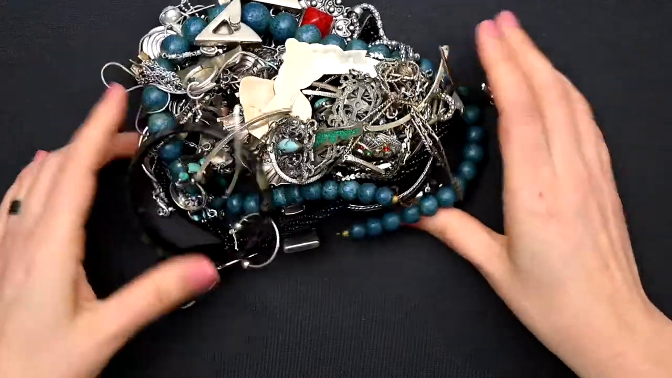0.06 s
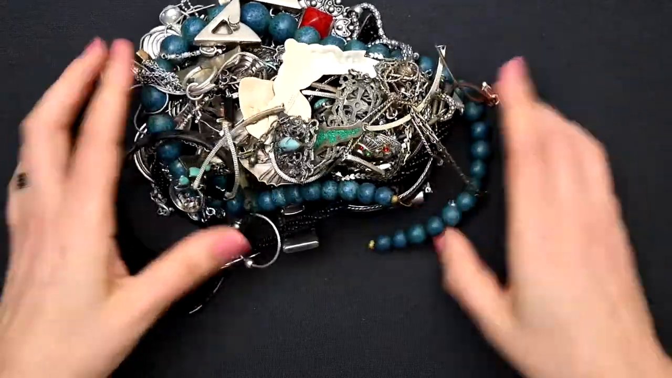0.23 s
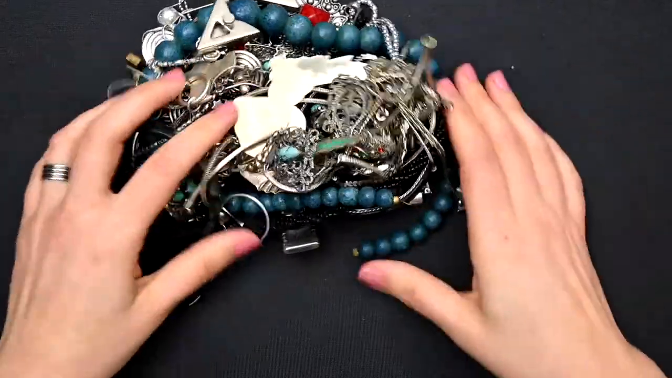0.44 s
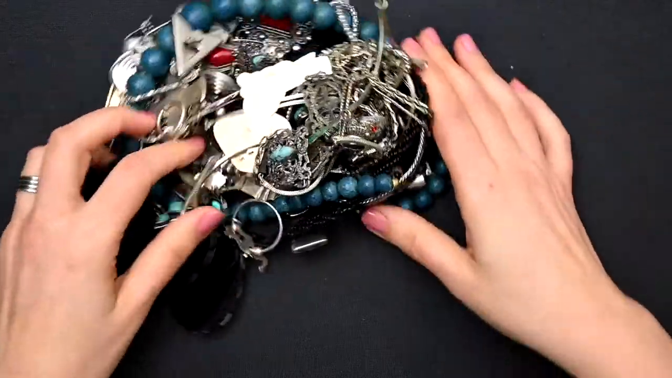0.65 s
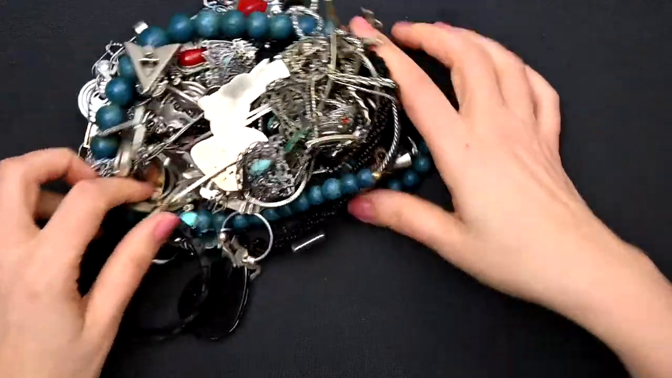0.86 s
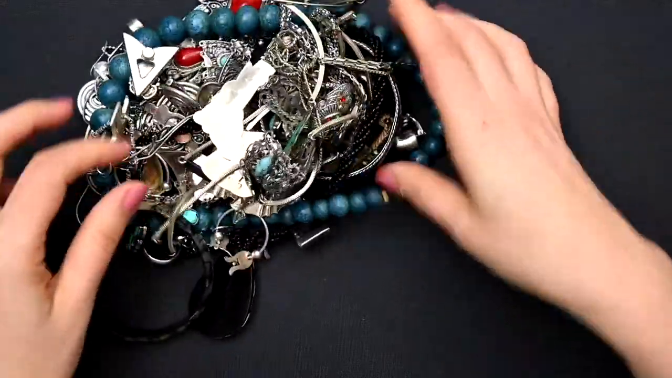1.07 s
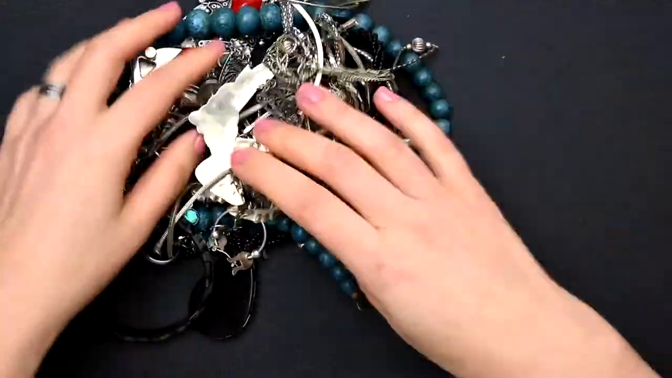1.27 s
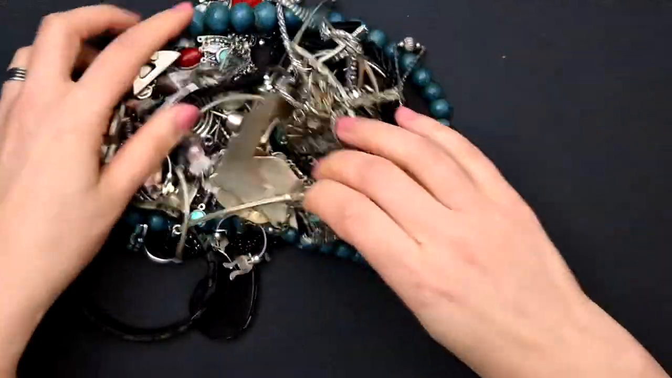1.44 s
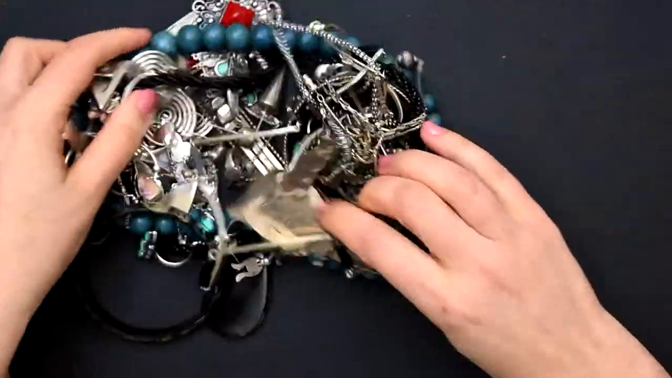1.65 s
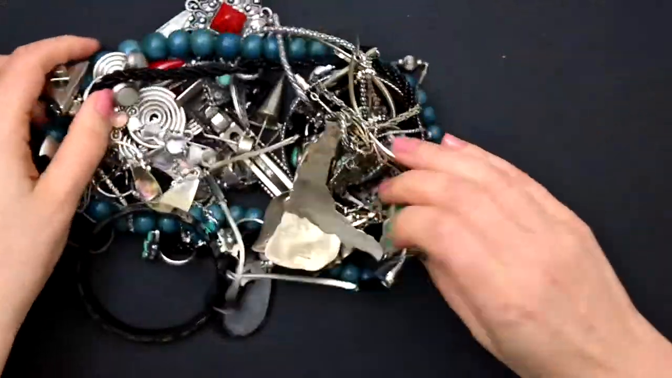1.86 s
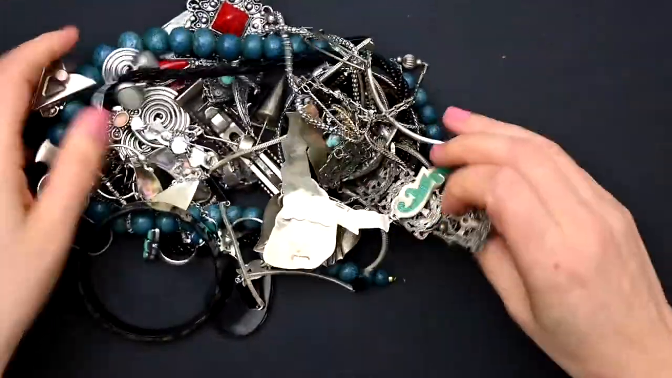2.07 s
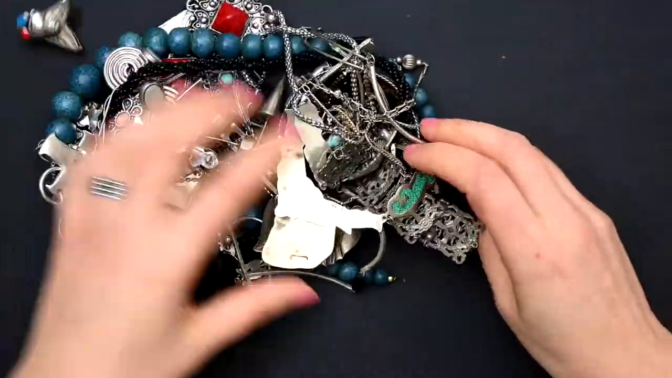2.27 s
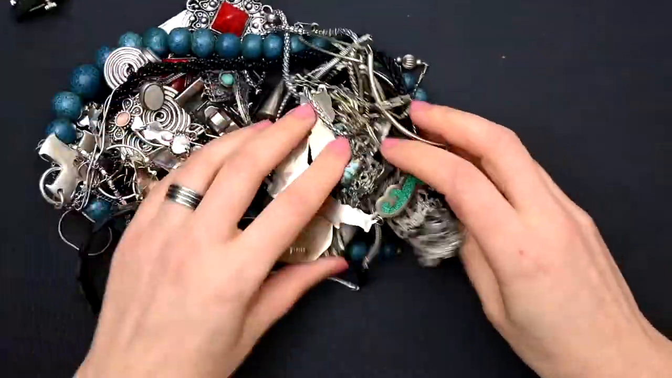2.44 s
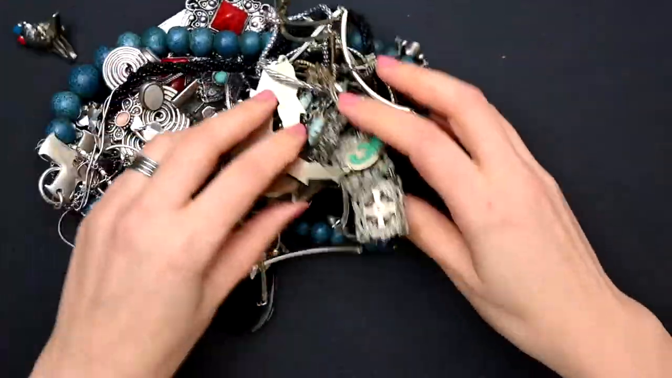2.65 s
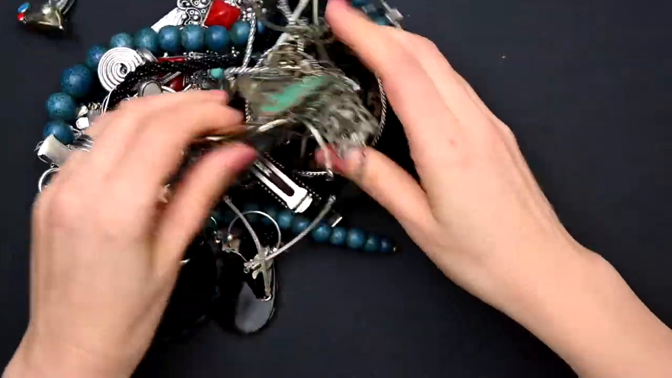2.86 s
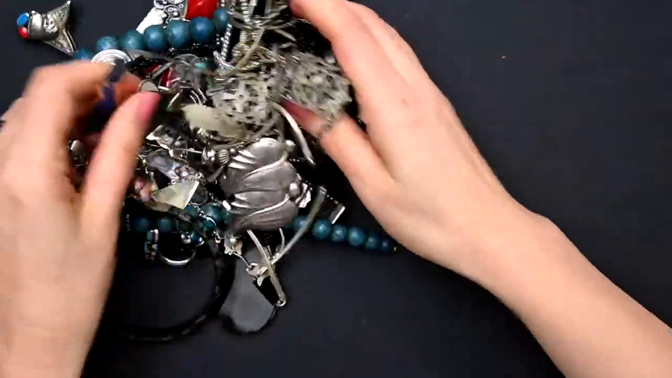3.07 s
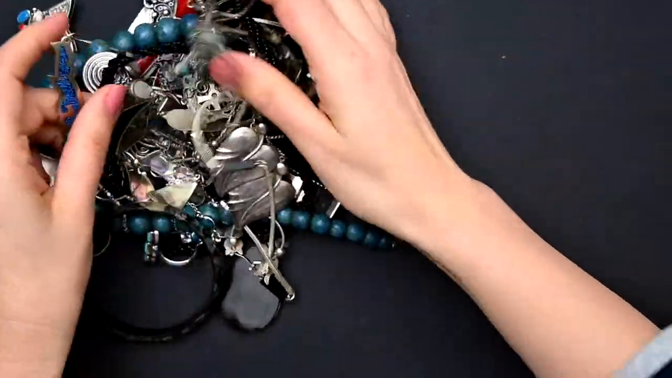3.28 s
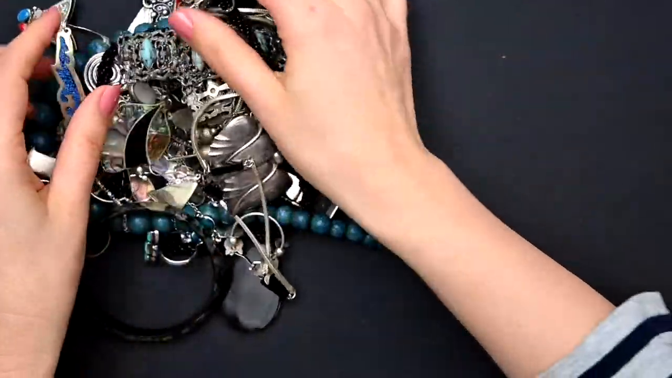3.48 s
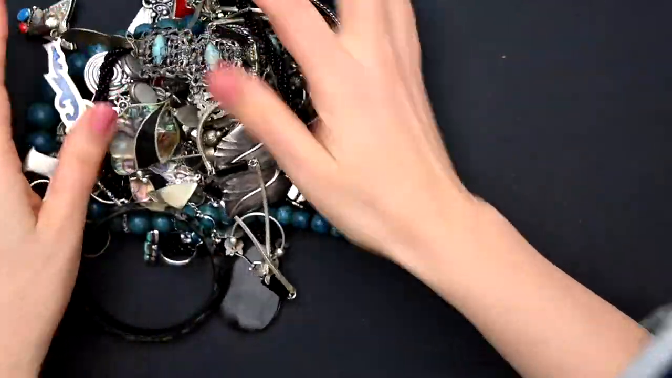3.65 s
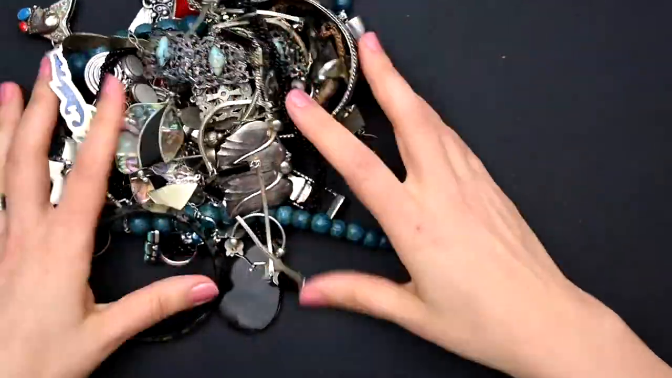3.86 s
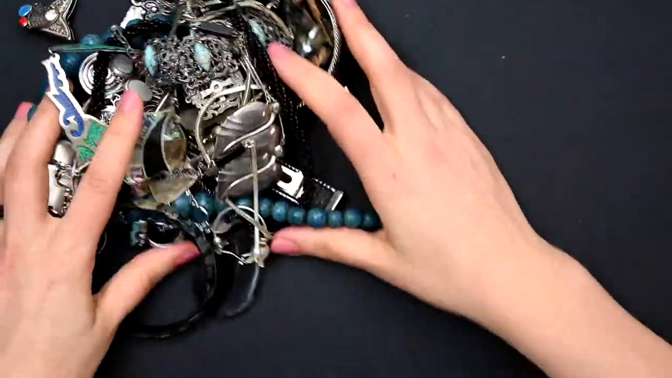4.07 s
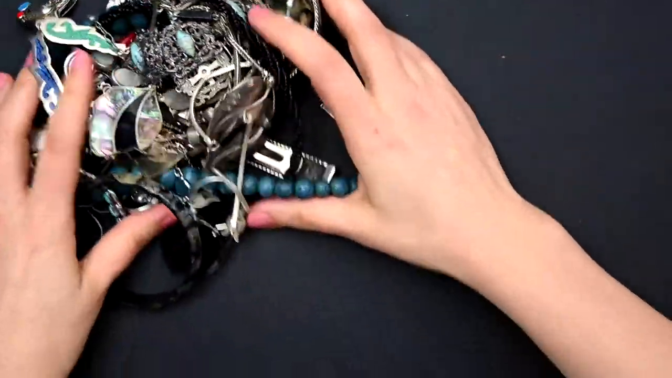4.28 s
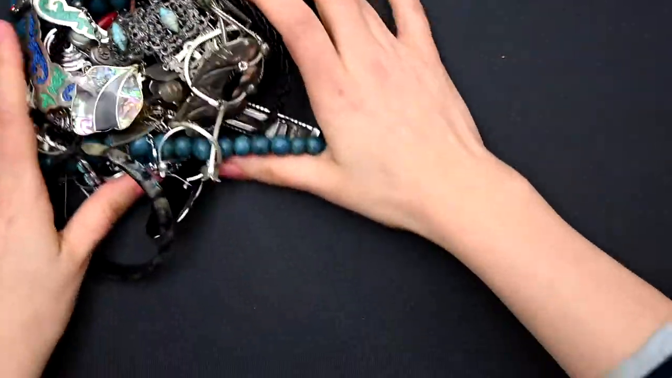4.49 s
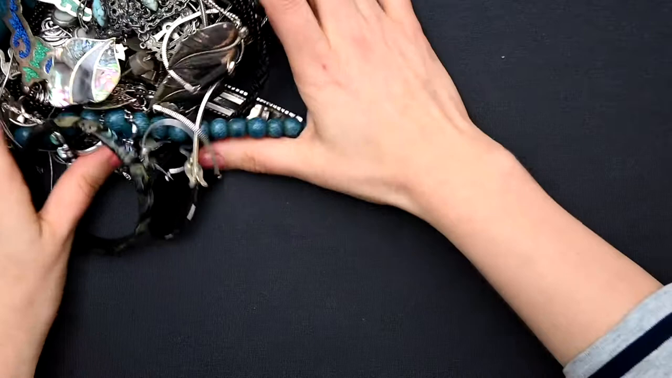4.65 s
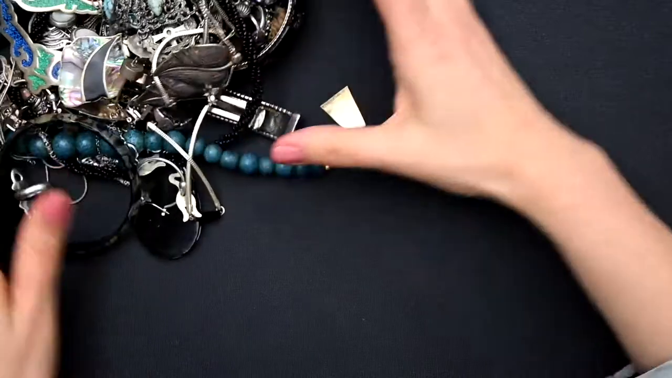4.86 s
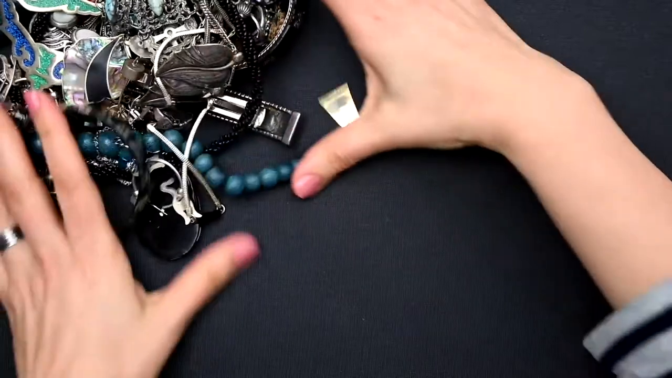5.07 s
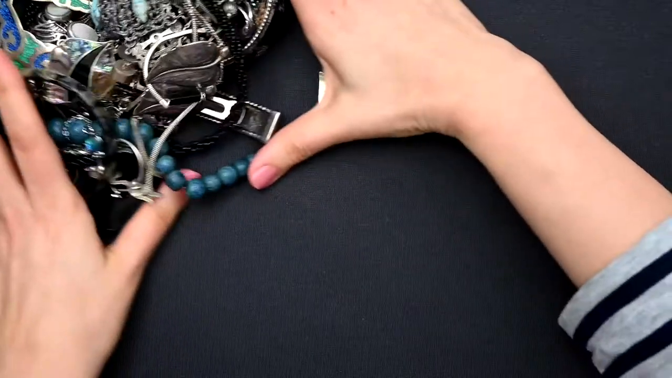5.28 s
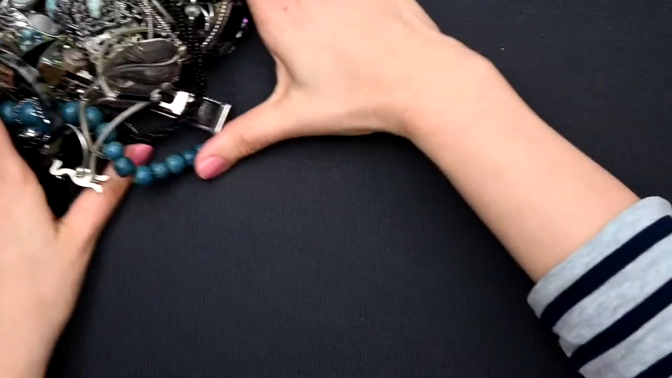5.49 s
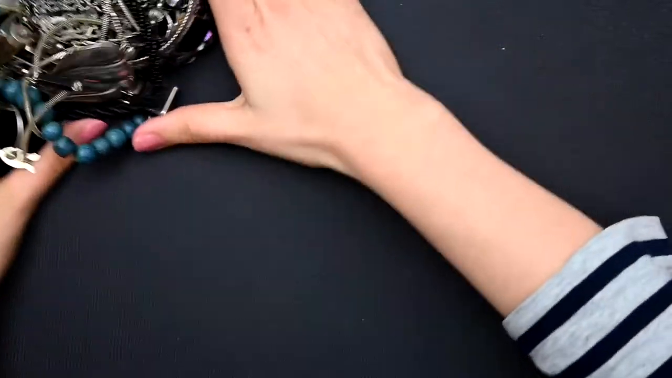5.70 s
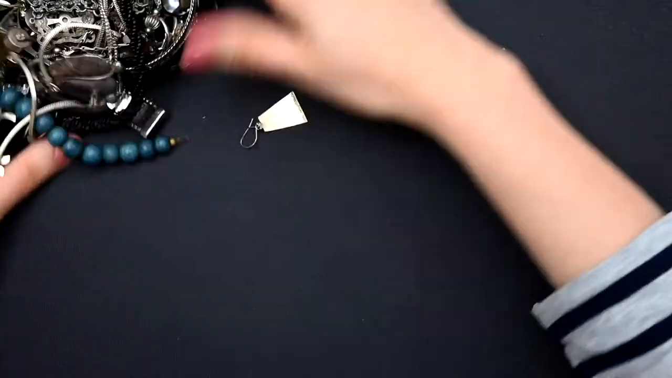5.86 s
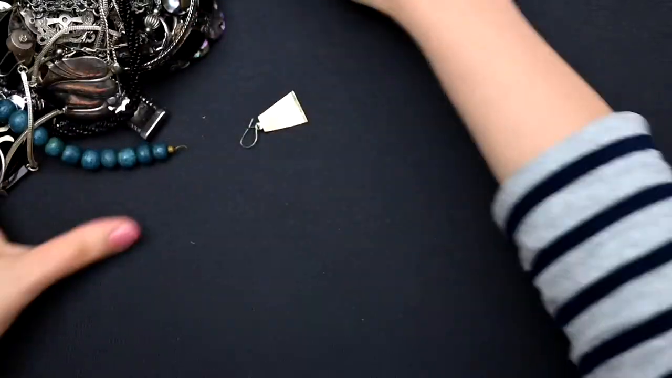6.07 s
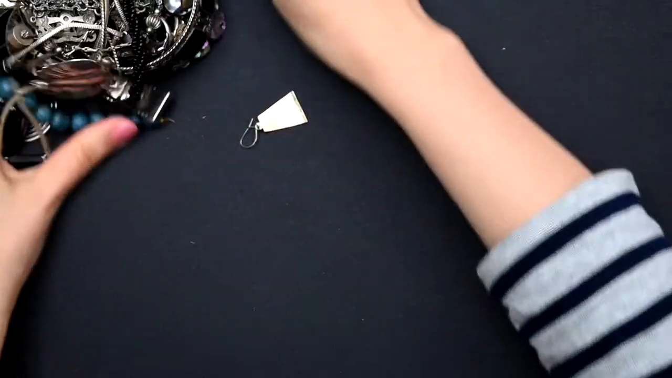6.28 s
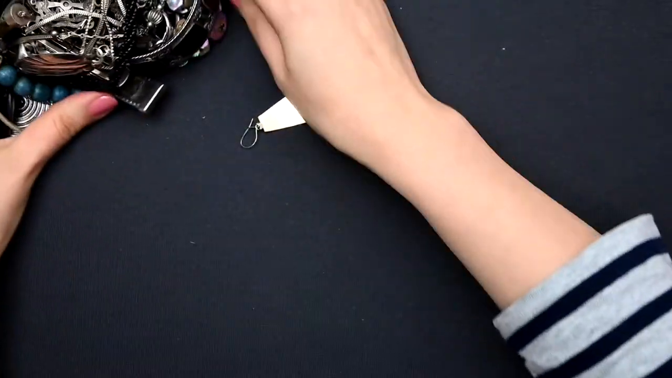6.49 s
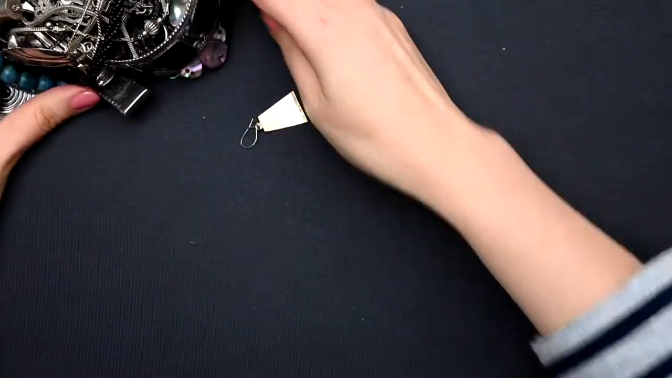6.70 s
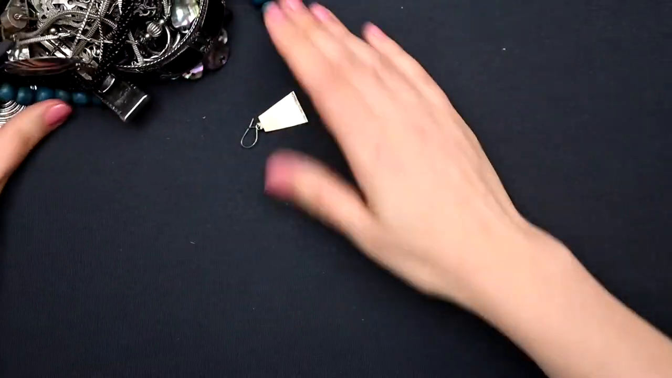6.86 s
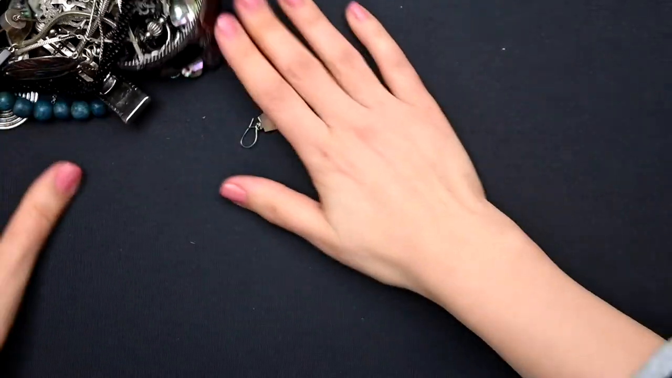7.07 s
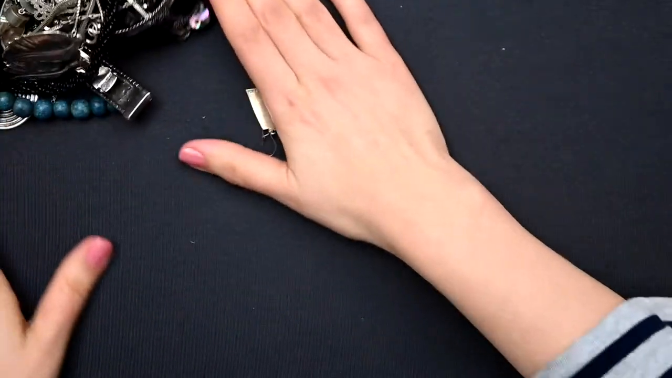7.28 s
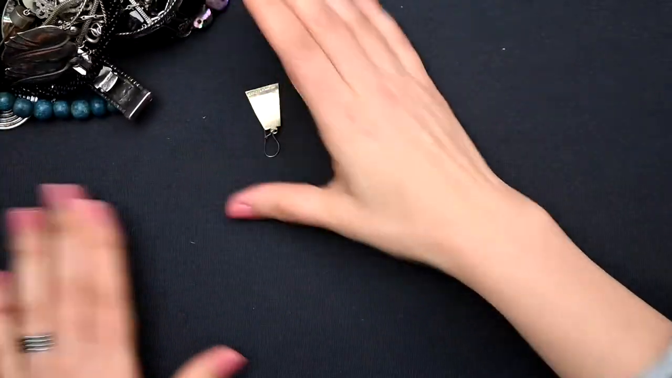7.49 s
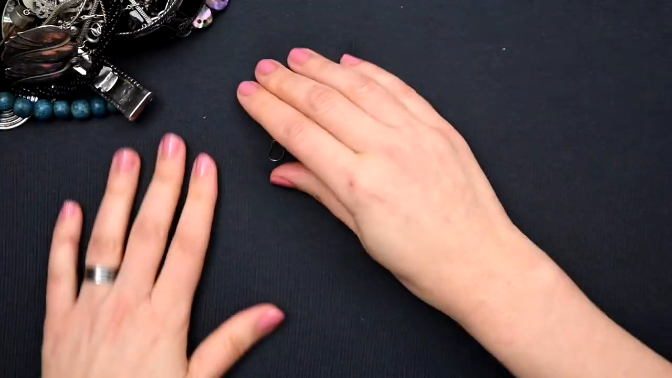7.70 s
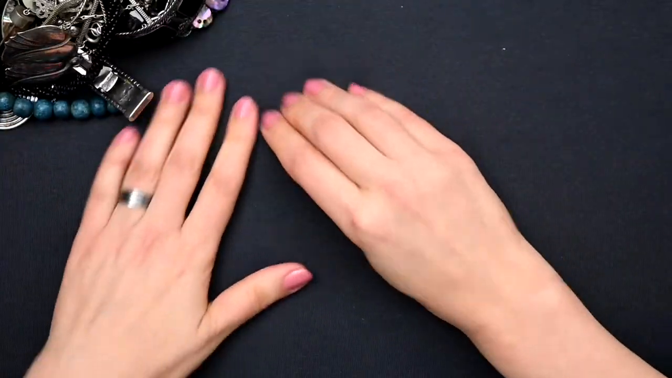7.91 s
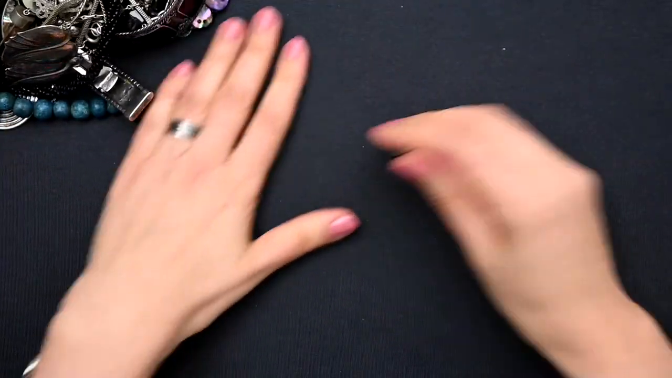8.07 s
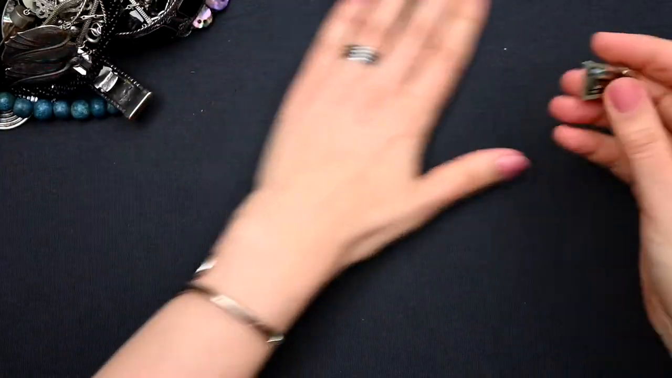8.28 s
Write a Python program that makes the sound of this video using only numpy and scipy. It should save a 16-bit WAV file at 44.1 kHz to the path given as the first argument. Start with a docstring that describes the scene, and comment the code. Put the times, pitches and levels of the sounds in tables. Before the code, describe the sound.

Tangled metal jewellery and beads jingle and tick in irregular bursts as hands stir and push the pile across a cloth-covered table.

```python
"""A heap of chains, earrings and beads clicks in clumps as two hands rummage in it, then push it aside.
Small contacts crack and ring over a fine rustle; clear ones add a main ring, and some free pieces sing.
The heap drags on the cloth (shaped noise), one knock excites the table's modes and wrists press softly.
A small microphone with peaks near 5 and 13 kHz colours the contacts, in mono in a quiet room.
Only its faint noise hiss differs left and right."""
import sys
import numpy as np
from scipy import signal
from scipy.fft import rfft, irfft, next_fast_len
from scipy.io import wavfile

SR = 44100
rng = np.random.default_rng(int(sys.argv[2]) if len(sys.argv) > 2 else 0)


def to_linear_factor(level_db):
    """Convert decibel levels (scalar or array-like) to linear amplitude factors."""
    exponent = np.asarray(level_db, float) / 20
    return 10 ** exponent


def output_pcm(signal):
    """Save a mono or channel-first signal as 16-bit PCM at the path in sys.argv[1].

    Samples are clipped to [-1, 1] before scaling.
    """
    pcm = np.clip(np.atleast_2d(signal).T, -1, 1) * 32767
    wavfile.write(sys.argv[1], SR, np.round(pcm).astype(np.int16))


N = 367794  # length in samples


def along(points, hz):
    """Reads a value between (Hz, value) points on a log frequency axis."""
    point_hz, value = np.transpose(points)
    return np.interp(np.log(hz + 1), np.log(point_hz + 1), value)


def filtered(x, response):
    """Multiplies the spectrum of x by a response, which may be complex."""
    size = next_fast_len(N + SR // 4)
    spectrum = rfft(x, size) * response(np.fft.rfftfreq(size, 1 / SR))
    return irfft(spectrum, size)[..., :N]


def noise(spectrum):
    """Coloured noise scaled to rms 1."""
    x = filtered(rng.standard_normal(N), lambda hz: to_linear_factor(along(spectrum, hz)))
    return x / np.sqrt(np.mean(x ** 2) + 1e-20)


def placed(times, shapes):
    """Adds up one short shape per row, each at its own time in seconds."""
    start = np.round(np.asarray(times) * SR).astype(int)[:, None]
    at = start + np.arange(shapes.shape[1])
    return np.bincount(at.ravel(), shapes.ravel(), N + shapes.shape[1])[:N]


def dying(t60, seconds, rise):
    """Time axis and envelopes that rise fast, then fall by 60 dB in t60 seconds."""
    t = np.arange(int(seconds * SR)) / SR
    return t, (1 - np.exp(-t / rise)) * to_linear_factor(-60 * t / np.reshape(t60, (-1, 1)))


def tone(hz, t):
    """One sine per row."""
    return np.sin(2 * np.pi * hz[:, None] * t)


# Each swell of the rattle as a hand stirs the heap; the last rows only brush the cloth.
# Each row: peak time in seconds, strength in dB, build-up and settling in seconds per 20 dB
# (the sign is ignored), share of heavier pieces in dB.
RATTLE_SWELLS = [(0.01, -51, 4.33, 0.42, 2), (.095, -36.5, -0.0051, 0.0316, 2.5),
                 (.21, -47.5, 0.27, 0.08, 3.5), (.392, -35.5, 0.04, 0.26, -2), (.6, -48.5, .3, 0.37, 1),
                 (.708, -37, 0.0822, 0.0365, 0.5), (.8, -42.5, 0.14, 0.052, 5), (.9, -41.5, 0.29, 0.23, 3),
                 (1.0, -47.5, 0.78, 0.3, -0.5), (1.268, -41.5, -0.02, 0.2244, 4.5),
                 (1.35, -38, 0.02, 0.345, 1), (1.444, -37.5, 0.1263, 0.1321, 1),
                 (1.505, -30, 0.01, 0.16, 0.5), (1.555, -33, 0.05, 0.0731, 0.5),
                 (1.681, -36, 0.27, 0.3324, 3), (1.951, -49.5, -0.32, 0.14, -3.5),
                 (2.04, -43.5, -0.4, 0.07, -9), (2.09, -42, -0.13, 0.1333, 3), (2.155, -36.5, 0.06, .05, 2),
                 (2.365, -46, -0.01, 0.13, -4), (2.48, -49, 0.0053, 0.14, -5),
                 (2.537, -38.5, 0.0846, 0.2047, 4), (2.588, -33, 0.0749, 0.0137, 0.5),
                 (2.65, -52.5, 0.01, 0.2, -3.5), (2.734, -42.5, 0.2462, 0.2136, -1.5),
                 (2.794, -46.5, -0.1056, 0.71, 1.5), (2.943, -28.5, 0.0757, 0.13, 0.5),
                 (3.066, -35, 0.0119, 0.2012, 0), (3.243, -42, 0.04, 0.24, -2),
                 (3.31, -46, 0.09, 0.2, -2.5), (3.41, -31, .04, 0.0443, -4), (3.46, -42, .05, .1, 0),
                 (3.589, -46, 0.0861, 0.12, -2.5), (3.88, -53.5, 0.11, 0.36, 2),
                 (3.916, -37.5, 0.0218, 0.05, 4), (4.04, -45.5, 0.104, 0.236, 3.5),
                 (4.12, -45.5, 0.1329, 0.32, 2.5), (4.375, -49, 0.245, 0.51, 2),
                 (4.465, -45.5, 0.0837, 0.27, 3), (4.553, -39, -0.06, 0.1021, -0.5),
                 (4.775, -44, 0.13, -0.04, 1), (4.86, -38.5, 0.19, .11, 3), (4.94, -52, .04, .06, 2),
                 (5.05, -55, .015, .05, 2.5), (5.117, -45, .012, 0.4062, 5),
                 (5.276, -43.5, 0.0951, -0.07, -1), (5.383, -46.5, -0.58, 0.03, 3.5),
                 (5.53, -45, -0.52, -0.24, 1), (5.607, -44.5, 0.01, 0.19, 7.5),
                 (5.735, -42, 0.01, 0.18, 4.5), (5.8, -46.5, -0.01, .1, 5.5),
                 (5.924, -40.5, 0.1331, .09, 2.5), (6.03, -53, .12, .05, 3.5), (6.166, -52, .005, 0.54, 6),
                 (6.305, -40, .06, 0.211, 7), (6.35, -36.5, .08, 0.0656, 5), (6.4, -31, 0.0479, 0.0663, 3),
                 (6.513, -48, 0.48, .5, 2.5), (6.715, -47, 0.17, 0.16, -1), (6.824, -44, 0.04, 0.12, -2),
                 (6.904, -46, 0.08, 0.1436, 3.5), (7.058, -44, -0.0179, 0.0634, 6),
                 (7.119, -32.5, 0.0155, 0.1566, -1.5), (7.326, -48.5, 0.19, 0.11, 2),
                 (7.452, -44, -0.0154, 0.1161, -4.5), (7.68, -57.5, 0.69, 0.42, 0.5),
                 (7.99, -57.5, -0.0955, 0.25, 7), (8.1, -63.5, 0.24, 0.09, 9.5),
                 (8.33, -58.5, 0.36, 12.5, 7)]
# How fine links, beads and heavy pieces answer a swell, one row per sort.
# Each row: level in dB for a swell of -45 dB, dB gained per dB of swell,
# dB gained per dB of heavier share, level at rest in dB.
PIECE_SORTS = [(-45.5, 1, 0, -74.5), (-52, 0.88, 1, -73.5), (-59, 0.7579, 1.1086, -85.5)]


def stirring():
    """Level in dB of each sort of piece: swells build up, peak and settle, and add in power."""
    peak_s, db, build_s, settle_s, heavier_db = np.transpose(RATTLE_SWELLS)[..., None]
    coarse_s = np.arange(0, N / SR, 1 / 1000)
    build = (peak_s - coarse_s) / np.abs(build_s)
    settle = (coarse_s - peak_s) / np.abs(settle_s)
    swell_db = db - 20 * np.where(coarse_s < peak_s, build, settle)
    levels_db = []
    for mean_db, grows, share, rest_db in PIECE_SORTS:
        sort_db = mean_db + grows * (swell_db + 45) + share * heavier_db
        power = to_linear_factor(2 * sort_db).sum(axis=0) + to_linear_factor(2 * rest_db)
        levels_db.append(np.interp(np.arange(N) / SR, coarse_s, 10 * np.log10(power)))
    return levels_db


# Colour of the contacts as the microphone hears them.
# Each row: frequency in Hz, level in dB.
MICROPHONE_COLOUR = [(590, -51.5), (1000, -29.5), (1310, -19), (2680, -16.5), (2870, -19.5), (3120, -19),
                     (4380, 1.5), (4990, 3.5), (6380, -5.5), (7970, -4), (9850, 2.5), (10800, 4),
                     (13200, 16.5), (15600, 10.5), (16500, -21.5)]


def band(x, low_hz, high_hz):
    """One band of contact sound in the microphone's colour; white noise keeps its level."""
    def shape(hz):
        edges = (1 + (low_hz / (hz + 1)) ** 12) * (1 + (hz / high_hz) ** 12)
        return to_linear_factor(along(MICROPHONE_COLOUR, hz)) / np.sqrt(edges)

    gain = np.sqrt(np.mean(shape(np.linspace(0, SR / 2, num=999)) ** 2))
    return filtered(x, shape) / gain


# The three bands of contact sound: treble, middle, low.
# Each row: lower edge in Hz, upper edge in Hz.
CONTACT_BANDS = [(9000, 17000), (3200, 9000), (750, 3200)]


def struck(times, bands_db, longest_db, count=6):
    """Each struck piece sounds a few modes at once; most die quickly, the longer ones are weaker."""
    pitch, length, weakness = rng.random((len(times) * count, 3)).T
    hz = 1000 + 14800 * pitch ** 1.5
    which = np.sum(hz < np.transpose(CONTACT_BANDS)[0][:2, None], axis=0)  # 0 treble, 1 middle, 2 low
    level_db = np.repeat(bands_db, count, axis=1)[which, np.arange(len(hz))]
    # microphone colour relative to one reference pitch in each band
    reference_db = along(MICROPHONE_COLOUR, np.array([13200, 5000, 2000]))[which]
    colour_db = along(MICROPHONE_COLOUR, hz) - reference_db
    t, fade = dying(0.004 * to_linear_factor(longest_db * length ** 3), seconds=1 / 40, rise=0.0004)
    size = to_linear_factor(level_db + colour_db - 10 * weakness - 7 * length ** 3)
    return placed(np.repeat(times, count), size[:, None] * fade * tone(hz, t))


# How far the ringing of small contacts stands over the level of their sort.
# The values are for links, beads and heavy pieces, in dB.
SMALL_RING_DB = [21, 18.5, 14]
# Steady rustle compared with the cracks, for the same three sorts, in dB.
STEADY_RUSTLE_DB = [-8.5, -6.5, -3]


def rattle(levels_db, count=1400):
    """Many small uneven contacts over a fine rustle: each cracks in all bands and rings its piece."""
    when, smallness, length = rng.random((count, 3)).T
    times = when * 7.55  # no contacts start after this second; the rustle goes on
    size_db = -4 * np.log(smallness + 0.05)
    colour_db = 4.5 * rng.standard_normal((count, 3))
    t, fade = dying(0.005 * to_linear_factor(8 * length), seconds=1 / 60, rise=0.0006)
    level_then_db = np.array(levels_db)[:, (times * SR).astype(int)]
    total = struck(times, level_then_db + size_db + np.c_[SMALL_RING_DB], longest_db=18)
    for k, (edges, rustle_db) in enumerate(zip(CONTACT_BANDS, STEADY_RUSTLE_DB)):
        crack = to_linear_factor(size_db + colour_db[:, k])[:, None] * fade
        power = placed(times, crack ** 2)
        shaken = np.sqrt(power * to_linear_factor(-2 * rustle_db) + 1)  # the 1 is the steady rustle
        total = total + band(to_linear_factor(levels_db[k]) * shaken * rng.standard_normal(N), *edges)
    return total


# Clear single contacts, with levels before the gains in clinks().
# Each row: start in seconds, ring level in dB, ring pitch in Hz,
# middle crack and low crack, both in dB relative to the ring level.
CLEAR_CONTACTS = [(0.0546, -27.5, 14800, -12.5, -27), (0.0752, -16.5, 4534, -15, -15),
                  (0.0902, -15.5, 12960, -15, -16.5), (0.3231, -34, 14500, -20.5, -26),
                  (0.3675, -20, 12300, -22.5, -25), (0.3801, -14, 9765, -23.5, -30),
                  (0.4312, -21, 13570, -18, -25.5), (0.4865, -28.5, 13100, -18.5, -32.5),
                  (0.601, -23.5, 11650, -21, -22.5), (0.6212, -20, 12210, -18.5, -25),
                  (0.6772, -23.5, 13300, -21.5, -21.5), (0.7086, -20, 14640, -30.5, -19.5),
                  (0.7801, -17.5, 12120, -20, -22), (0.8055, -16.5, 13000, -17.5, -27),
                  (0.8613, -12, 12500, -20, -34), (0.8879, -20.5, 13000, -17, -23.5),
                  (0.9281, -20, 12200, -14.5, -20.5), (1.0816, -25, 12900, -31, -41.5),
                  (1.27, -6, 12780, -18, -31.5), (1.3322, -16.5, 12530, -15.5, -16),
                  (1.3572, -24.5, 14800, -16.5, -29), (1.3763, -17, 13140, -12, -24),
                  (1.3971, -19.5, 15100, -17.5, -28.5), (1.4221, -19.5, 13160, -18, -33.5),
                  (1.4391, -13.5, 12020, -16, -30), (1.4516, -13, 15300, -17, -30),
                  (1.4776, -25.5, 13300, -17, -46.5), (1.496, -18.5, 12380, -11.5, -34),
                  (1.5075, -14.5, 13270, -11, -36), (1.5377, -15.5, 13230, -10.5, -32),
                  (1.5618, -19.5, 12600, -12, -27), (1.5993, -25, 14400, -13, -26),
                  (1.6192, -14.5, 12570, -23, -40.5), (1.64, -22, 4880, -14.5, -25.5),
                  (1.6517, -17.5, 12670, -12, -21.5), (1.6726, -18, 4910, -10, -24),
                  (1.6859, -20, 13270, -13.5, -31.5), (1.7104, -17.5, 13340, -14.5, -38.5),
                  (1.7515, -26, 4520, -14, -26), (1.7685, -23.5, 13350, -21, -28.5),
                  (1.7818, -15.5, 13400, -28.5, -42), (1.8223, -23, 9100, -16.5, -36),
                  (1.945, -22, 14650, -14.5, -33.5), (1.9968, -19, 15200, -26.5, -28.5),
                  (2.0683, -19.5, 12800, -16.5, -31), (2.0956, -16.5, 13100, -15.5, -32.5),
                  (2.1149, -14, 13030, -13, -33.5), (2.1374, -20.5, 14600, -15.5, -22),
                  (2.1922, -7.5, 13250, -20.5, -34.5), (2.3694, -31, 12100, -21.5, -22),
                  (2.3815, -19.5, 11800, -19, -26), (2.4266, -21, 12900, -24, -30),
                  (2.5296, -19, 4496, -10.5, -36), (2.5473, -18, 14500, -15.5, -25.5),
                  (2.576, -17, 14700, -30, -28), (2.6869, -17.5, 14600, -22, -32),
                  (2.7097, -28, 14500, -19.5, -22), (2.7834, -25, 12800, -17, -26.5),
                  (2.806, -22.5, 12800, -21, -35.5), (2.8822, -17, 13350, -22.5, -26),
                  (2.9237, -13, 13400, -15.5, -25.5), (2.9583, -11, 13630, -16, -27.5),
                  (2.9807, -14.5, 15100, -21, -22), (3.0081, -10, 14520, -26.5, -32.5),
                  (3.056, -18, 12900, -12.5, -19), (3.1088, -11, 13100, -21.5, -30.5),
                  (3.1511, -18, 12700, -16.5, -32), (3.1737, -26, 14300, -18.5, -24.5),
                  (3.237, -24, 12900, -17, -28), (3.3138, -27, 13200, -15.5, -21.5),
                  (3.3493, -5, 12050, -27, -33.5), (3.3933, -9.5, 12990, -17.5, -41.5),
                  (3.4227, -12, 13700, -29.5, -44.5), (3.4556, -19.5, 13210, -15, -38.5),
                  (3.584, -19.5, 10100, -16, -39), (3.6505, -31, 14400, -10.5, -18),
                  (3.8788, -27.5, 12820, -23, -23.5), (3.9074, -26.5, 14600, -13.5, -13.5),
                  (3.9236, -21, 14800, -30, -27.5), (3.9996, -32.5, 13120, -9.5, -20),
                  (4.0335, -30.5, 4800, -10.5, -17.5), (4.0498, -23, 14500, -12, -24),
                  (4.1133, -21, 14300, -14, -39), (4.2416, -30, 12600, -14.5, -32.5),
                  (4.4454, -22.5, 11100, -25, -29), (4.4741, -25, 13770, -22.5, -30.5),
                  (4.532, -17, 15300, -16, -31.5), (4.6028, -15.5, 12800, -29.5, -33.5),
                  (4.6765, -24.5, 9950, -15, -30), (4.7345, -22.5, 13200, -23.5, -47.5),
                  (4.7629, -19, 13900, -13.5, -29), (4.813, -25.5, 13900, -15.5, -29),
                  (4.8344, -17, 13360, -16, -29.5), (4.8634, -21.5, 12330, -13.5, -32.5),
                  (4.9062, -10, 12760, -26, -49), (4.9199, -20.5, 13300, -19.5, -38.5),
                  (4.9756, -28.5, 12700, -26.5, -41.5), (5.0388, -32, 4990, -9.5, -28),
                  (5.0995, -27.5, 13200, -17.5, -34.5), (5.1138, -16, 4405, -17, -19.5),
                  (5.1468, -25, 12500, -11, -11), (5.1813, -26.5, 12900, -16, -31.5),
                  (5.255, -18, 12800, -17.5, -37), (5.2919, -21, 12930, -15, -31),
                  (5.3242, -22, 13200, -16.5, -20.5), (5.3787, -25.5, 15260, -12.5, -24),
                  (5.5256, -22, 13500, -19.5, -24.5), (5.5935, -22, 15100, -14, -19.5),
                  (5.624, -20.5, 13800, -15.5, -21.5), (5.6429, -19, 13550, -14, -22.5),
                  (5.726, -14.5, 9980, -15, -31), (5.7717, -14, 13600, -18.5, -36.5),
                  (5.8139, -24, 13500, -16, -25.5), (5.8358, -21, 13160, -16, -19.5),
                  (5.8699, -10, 13430, -17.5, -29), (5.9, -18.5, 14300, -19, -28),
                  (6.0425, -30.5, 13100, -9, -29), (6.1028, -35, 11700, -12, -15.5),
                  (6.1629, -19, 12630, -17, -29), (6.188, -19.5, 13540, -15.5, -33),
                  (6.2328, -21, 14100, -15, -23.5), (6.2838, -24.5, 11400, -13, -17.5),
                  (6.3031, -22, 13700, -13, -22.5), (6.3306, -15.5, 13700, -17.5, -28),
                  (6.3697, -16.5, 10830, -16, -24), (6.383, -13, 4636, -20.5, -19.5),
                  (6.3876, -7, 13400, -20.5, -34), (6.4208, -20.5, 5060, -14.5, -22),
                  (6.5069, -24, 14200, -11.5, -35.5), (6.5167, -25, 4953, -10, -38.5),
                  (6.6641, -29.5, 12720, -16.5, -32.5), (6.7, -27, 13000, -12.5, -35.5),
                  (6.7234, -23, 11000, -16, -43), (6.7837, -31, 4940, -11, -30),
                  (6.8359, -27, 4950, -9, -34), (6.8888, -19.5, 5290, -11, -38),
                  (6.8979, -18.5, 4594, -14, -41), (6.9629, -31, 5080, -13.5, -37.5),
                  (7.0536, -32, 15540, -9.5, -19), (7.0996, -18, 11700, -14, -23),
                  (7.1114, -21.5, 13600, -17.5, -38), (7.1203, -18.5, 13300, -20.5, -31),
                  (7.1715, -19.5, 13080, -12, -25.5), (7.213, -21.5, 13440, -25, -24),
                  (7.4729, -11, 12060, -31, -48.5)]
# Side modes over the crack level of each clear contact: treble, middle and low, in dB.
SIDE_MODES_DB = [9.5, 8.5, 5.5]


def clinks():
    """Each clear contact has a main ring, a few side modes and a crack of noise in three bands."""
    s, db, hz, middle_db, low_db = np.transpose(CLEAR_CONTACTS)
    treble_db = -32.5 + 0.696 * (db + 20.5)  # the treble crack grows more slowly than the ring
    crack_db = np.array([treble_db, db + middle_db, db + low_db])
    t, fade = dying(0.00737 * to_linear_factor(7.03 * rng.random(len(s))), seconds=1 / 30, rise=0.000558)
    total = placed(s, to_linear_factor(db - 2.5)[:, None] * fade * tone(hz, t))
    total += struck(s, crack_db + np.c_[SIDE_MODES_DB], longest_db=26)
    for edges, level_db in zip(CONTACT_BANDS, crack_db):
        bursts = to_linear_factor(level_db + 8)[:, None] * fade * rng.standard_normal(fade.shape)
        total = total + band(placed(s, bursts), *edges)
    return total


# Pieces that hang free and sing.
# Each row: start in seconds, pitch in Hz, level in dB, time to fall by 60 dB in seconds.
FREE_PIECES = [(0.008, 10400, -38, 0.07), (0.113, 14964, -36, 0.133), (1.002, 9410, -32.5, 0.0273),
               (2.86, 7180, -44, 0.12), (2.92, 15052, -24.5, 0.124), (2.95, 2943, -35.5, 0.072),
               (2.979, 2920, -45, 0.28), (2.985, 7190, -41, 0.134), (2.987, 4450, -34, 0.091),
               (3.065, 2900, -44.5, 0.178), (3.586, 10300, -36, 0.035), (3.772, 2500, -31.5, 0.013),
               (4.063, 14380, -39, 0.54), (4.173, 14400, -49.5, .3), (4.574, 15507, -34.5, 0.052),
               (4.785, 15484, -44.5, 0.06), (5.537, 7440, -37.5, 0.05), (5.597, 3000, -48, 0.2),
               (5.645, 2980, -50, .2), (5.623, 13600, -29.5, 0.123), (5.645, 15128, -38.5, 0.085),
               (5.771, 13630, -30.5, 0.077), (5.775, 4565, -47, 0.107), (5.775, 2950, -52, 0.15),
               (6.036, 14400, -46, 0.13), (6.102, 2246, -53.5, 0.126), (6.11, 822, -55, 0.104),
               (6.385, 672, -39.5, 0.029), (6.388, 10070, -24, 0.08), (7.098, 11701, -44.5, 0.045),
               (7.111, 4383, -31.5, 0.0406), (7.446, 4918, -39.5, 0.066), (7.445, 9800, -45.5, 0.103),
               (7.645, 13200, -36.5, 0.026), (7.694, 13520, -37, 0.03), (7.732, 12840, -41, 0.0276)]


def rings():
    """Free pieces hold one clean mode until they touch the heap again."""
    s, hz, db, t60 = np.transpose(FREE_PIECES)
    t, fade = dying(t60, seconds=1 / 7, rise=0.000506)
    free = 1 / (1 + (t / 0.09) ** 12)  # cut off around 90 ms
    return placed(s, to_linear_factor(db)[:, None] * fade * free * tone(hz, t))


# The heap drags on the cloth.
# Each row: time in seconds, level in dB.
DRAG_LEVEL = [(0.0, -63.5), (0.37, -68), (0.69, -65.5), (1.28, -69.5), (1.44, -62), (2.28, -68.5),
              (2.44, -66), (2.65, -65.5), (3.55, -72.5), (3.97, -64.5), (4.16, -60), (4.44, -56),
              (4.83, -68.5), (6.15, -68.5), (6.27, -62.5), (6.69, -70.5), (7.29, -62.5), (7.62, -71.5),
              (8.34, -67.5)]
# Colour of the dragging.
# Each row: frequency in Hz, relative level in dB per Hz.
DRAG_COLOUR = [(40, -34), (120, -6.5), (250, -1), (600, -0.5), (1100, -0.5), (2000, -30.5)]


def drag():
    """Rubbing on cloth is a coloured noise that swells and sinks."""
    s, db = np.transpose(DRAG_LEVEL)
    return to_linear_factor(np.interp(np.arange(N) / SR, s, db)) * noise(DRAG_COLOUR)


# A knuckle on the table.
# Each row: start in seconds, strength in dB before the gain in knock().
KNUCKLE = [(2.269, -17)]
# Broad modes of the table top.
# Each row: centre in Hz, width in Hz, level in dB.
TABLE_MODES = [(153, 215, -9.5), (492.2, 71.7, 2.5), (666, 132.5, 2.5), (1107, 134, 2), (1680, 310, -16.5),
               (2500, 510, -23)]


def knock():
    """A soft, short blow excites the broad modes of the table top."""
    start_s, strength_db = KNUCKLE[0]
    blow = placed([start_s], to_linear_factor(strength_db + 10.5) * np.hanning(18)[None])

    def response(f):
        total = 0
        for k, (centre, width, db) in enumerate(TABLE_MODES):
            damping = 1j * f * width
            mode = damping / (centre * centre - f * f + damping)
            total = total + (-1) ** k * to_linear_factor(db) * mode  # neighbours have opposite signs
        return total * (1j * f / (65 + 1j * f)) ** 2  # thins the sound below 65 Hz

    return -filtered(blow, response)


# Wrists lean on the table.
# Each row: start in seconds, pitch in Hz, level in dB.
WRISTS = [(.39, 52, -66), (1.34, 52, -68), (6.13, 105, -59), (6.15, 55, -64)]


def bumps():
    """Soft low pushes through the table are short, fading sines."""
    s, hz, db = np.transpose(WRISTS)
    t, fade = dying(np.full(len(s), 0.25), seconds=1 / 4, rise=0.0072)
    return placed(s, to_linear_factor(db)[:, None] * fade * tone(hz, t))


# How long the room's answer lasts.
# Each row: frequency in Hz, time to fall by 60 dB in seconds.
ROOM_DECAY = [(150, 0.67), (600, 0.73), (1500, 0.534), (5000, 0.352), (14000, 0.029)]


def room(x):
    """The room answers with a noise tail in which each frequency dies at its own speed."""
    hz, t, z = signal.stft(rng.standard_normal(SR // 2), SR, nperseg=256)
    dying_z = z * to_linear_factor(-60 * t / along(ROOM_DECAY, hz)[:, None])
    tail = signal.istft(dying_z, SR, nperseg=256)[1]
    late = np.pad(x, (200, 0))  # delay in samples
    return signal.fftconvolve(late, tail / np.linalg.norm(tail))[:N]


# Room tone, with a hump near 210 Hz for mains hum.
# Each row: frequency in Hz, relative level in dB per Hz.
AIR_COLOUR = [(20, -23.5), (42, 0), (50, 1), (60, 1.5), (180, -0.5), (210, 10), (240, -5.5), (600, -14),
              (1800, 2), (3000, -3), (16000, -19.5)]


def air():
    """The quiet room is a steady coloured noise."""
    return to_linear_factor(-66) * noise(AIR_COLOUR)


# Colour of the microphone's hiss.
# Each row: frequency in Hz, relative level in dB per Hz.
HISS_COLOUR = [(30, -13), (200, -3), (700, 1), (2000, -7), (6000, -4.5), (16000, -6.5)]


def hiss():
    """Microphone hiss is a faint noise, drawn separately for left and right."""
    return to_linear_factor(-71.5) * np.array([noise(HISS_COLOUR), noise(HISS_COLOUR)])


def scene():
    """Heap, table and room tone, alike in both channels."""
    heap = to_linear_factor(-3.5) * rattle(stirring()) + clinks() + rings()
    near = heap + to_linear_factor(-20) * room(heap)
    blow = knock()
    table = blow + to_linear_factor(-11.5) * room(blow) + bumps() + drag()
    mono = near + table + air()
    return np.array([mono, mono])


def top_cut(x):
    """Nothing passes above the cut-off."""
    return signal.sosfilt(signal.butter(12, 16960, fs=SR, output="sos"), x)


def record(dry):
    """Adds the hiss, then a steep low-pass removes the highest treble."""
    top_hz = 15865
    mix = filtered(dry + hiss(), lambda hz: 1 / (1 + (hz / top_hz) ** 90))
    return top_cut(mix)


dry = scene()
out = record(dry)
output_pcm(out)
```